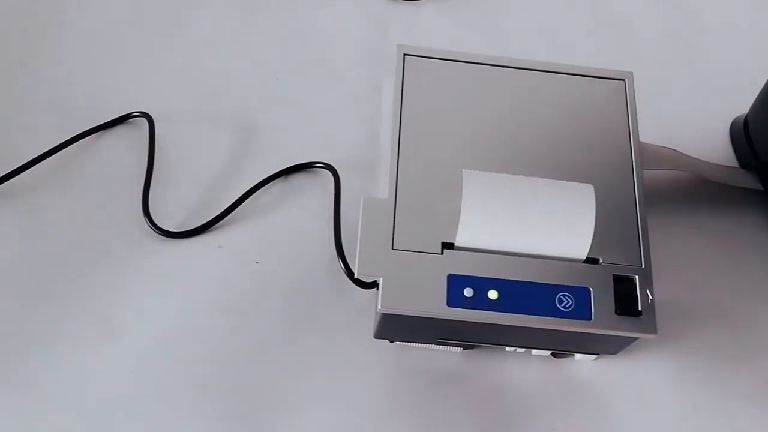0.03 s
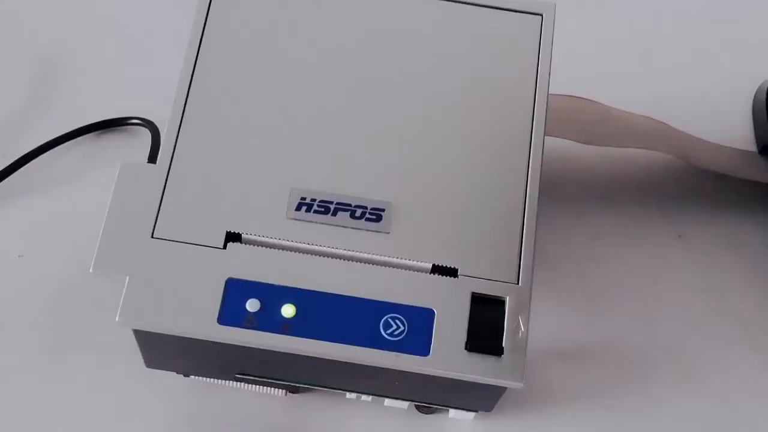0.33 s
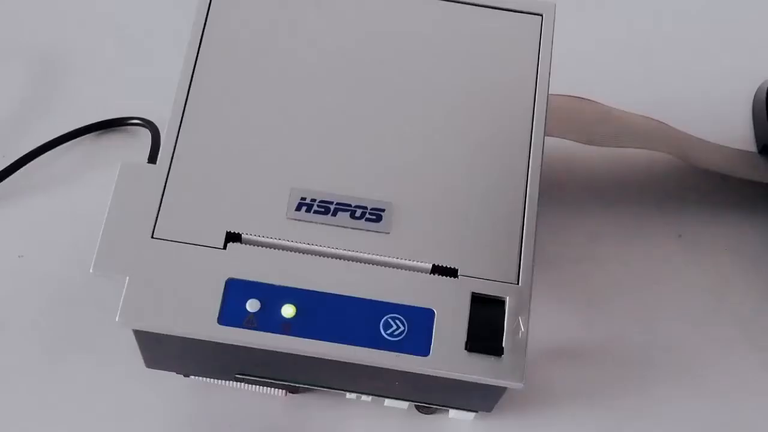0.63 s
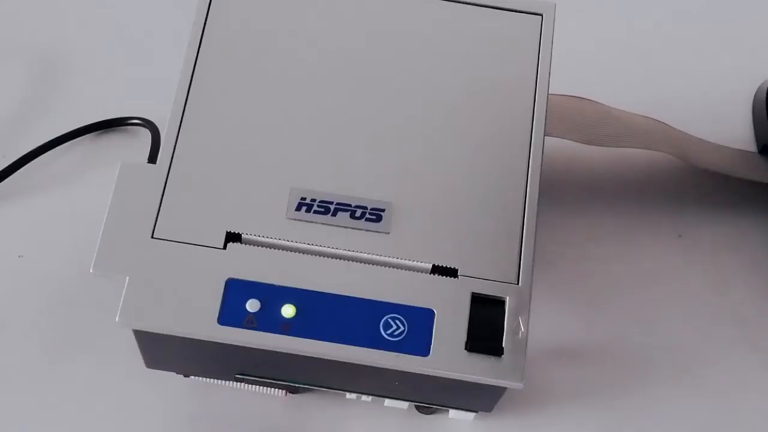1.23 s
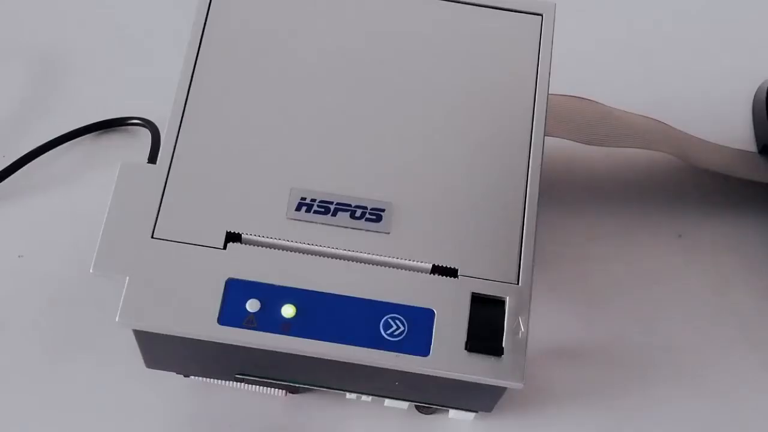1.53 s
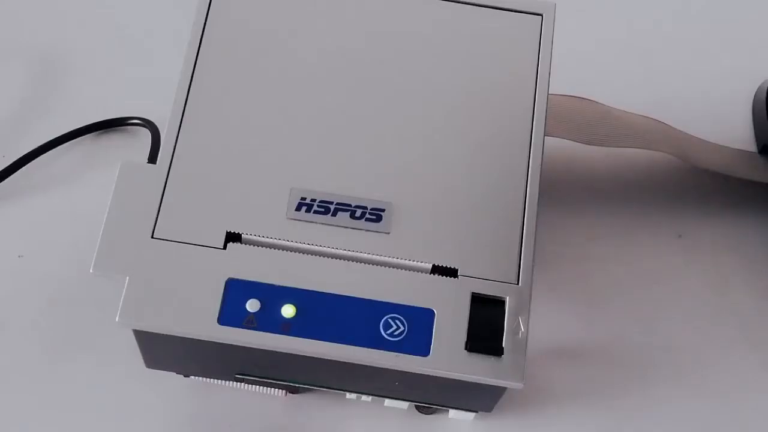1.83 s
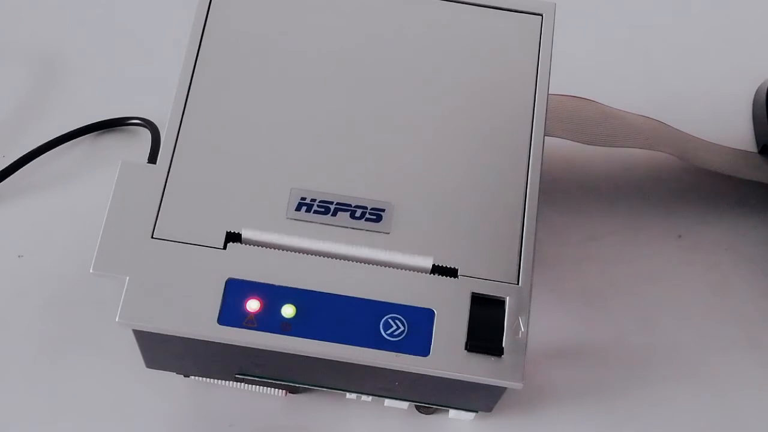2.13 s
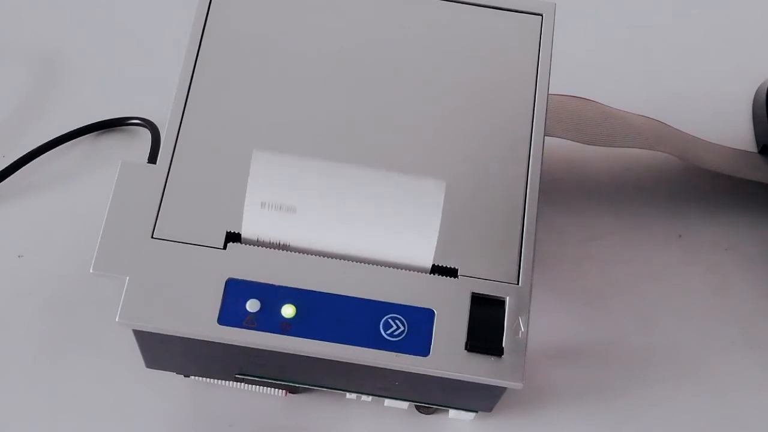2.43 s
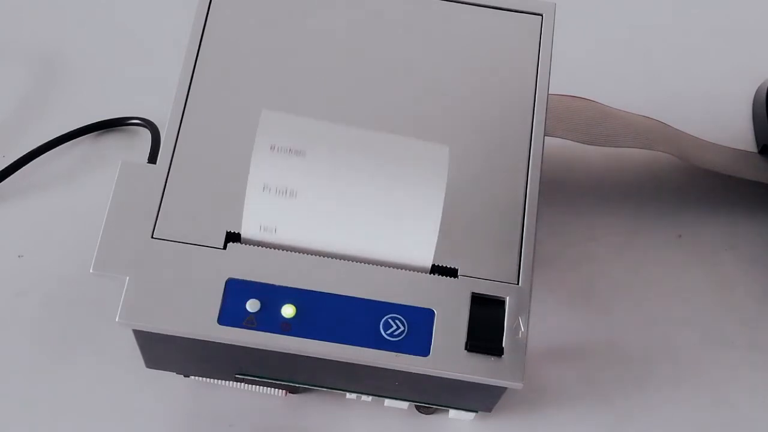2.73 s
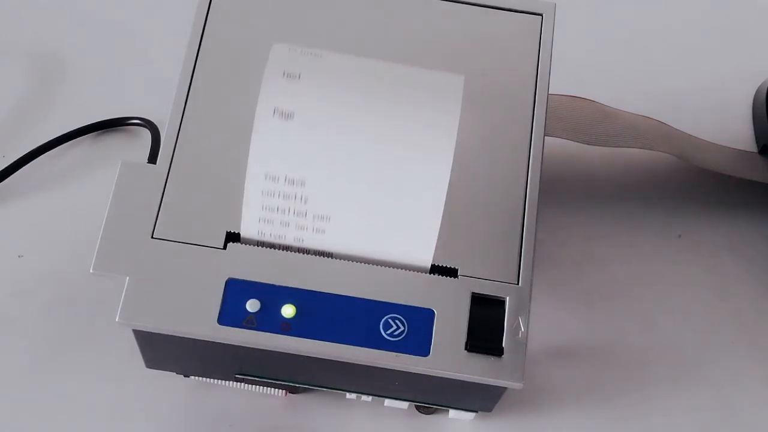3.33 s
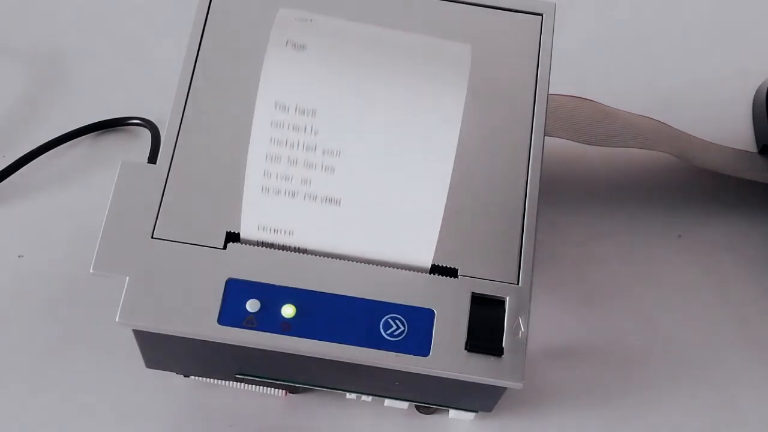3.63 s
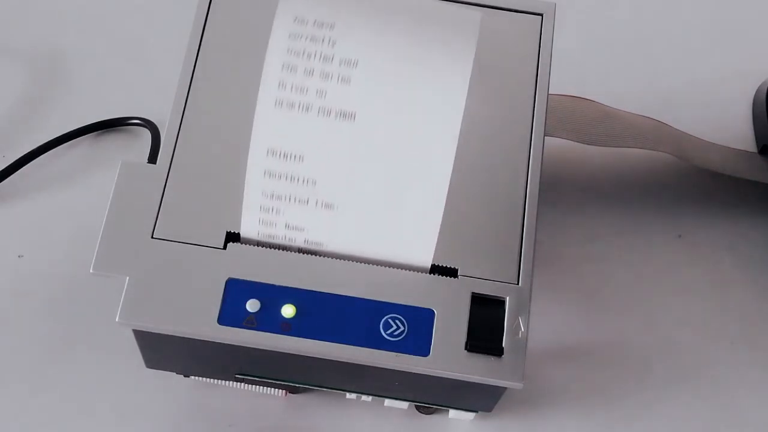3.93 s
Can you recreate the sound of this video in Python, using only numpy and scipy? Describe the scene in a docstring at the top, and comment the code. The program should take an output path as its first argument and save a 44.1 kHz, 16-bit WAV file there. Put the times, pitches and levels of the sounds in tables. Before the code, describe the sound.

A small receipt printer starts with a rattle and whines steadily, feeding out paper.

```python
"""On a table in a quiet room, a small thermal receipt printer is heard from close by.
A hand brushes past, the sound drops out briefly, and faint ticks sound over the room's rumble and hum.
Then the stepper motor, which turns in tiny steps, starts with a rattle and whines steadily,
throbbing once per turn of its gear. The gear teeth buzz and rub. The paper coming out
gives off the whine's lower tones more and more, and adds a rasp and a falling ring."""
import sys
import numpy as np
from scipy import signal
from scipy.fft import rfft, irfft
from scipy.io import wavfile

SR = 44100
rng = np.random.default_rng(int(sys.argv[2]) if len(sys.argv) > 2 else 0)


def unload_audio(sound):
    """Save the sound as a 16-bit wav file, at the path given as the first command line argument."""
    columns = np.transpose(np.atleast_2d(sound))
    # keep every value between -1 and 1, then stretch to whole-number steps
    steps = np.round(np.clip(columns, -1, 1) * 32767)
    wavfile.write(sys.argv[1], SR, steps.astype(np.int16))


N = 176400
T = np.arange(N) / SR
START_S, STEP_HZ, STEPS_PER_TURN = 2.112, 896.18, 15   # the motor
DROPOUT_START_S, DROPOUT_END_S = .2986, .4192


def from_db(db):
    """Turn decibels into a factor to multiply by."""
    return 10 ** (np.asarray(db) / 20)

def curve(rows):
    """Join (time, value) points with straight lines."""
    return np.interp(T, *np.transpose(rows))

def rms_one(x):
    """Scale a signal to an average strength (rms) of 1."""
    return x / np.sqrt(np.mean(x ** 2) + 1e-20)

def colour(x, points):
    """Give a sound a colour: (f/Hz, level/dB) points say how strong its pitches are next to each other."""
    hz, db = np.transpose(points)
    bins = np.maximum(np.arange(N // 2 + 1) * SR / N, 1)
    gain = from_db(np.interp(np.log(bins), np.log(hz), db))
    gain /= np.sqrt(1 + (hz[0] / 2 / bins) ** 4)   # fade away below the first point
    return irfft(rfft(x) * rms_one(gain), N)

def noise(points):
    """Steady noise of the given colour, with a strength near 1."""
    return colour(rng.standard_normal(N), points)

def drift(hz):
    """A random wobble of strength 1, mostly slower than hz."""
    bins = np.arange(N // 2 + 1) * SR / N
    return rms_one(irfft(rfft(rng.standard_normal(N)) / (1 + (bins / hz) ** 2), N))

def resonance(hz, width_hz):
    """Noise that rings around one pitch, which may slide."""
    angle = 2 * np.pi * np.cumsum(hz * np.ones(N)) / SR
    return drift(width_hz) * np.cos(angle) + drift(width_hz) * np.sin(angle)

def bursts(rows, points, decay_s):
    """Short knocks: at each (t/s, level/dB), noise starts at once and dies away."""
    envelope = sum(from_db(db) * (T >= s) * np.exp(-np.abs(T - s) / decay_s) for s, db in rows)
    return colour(envelope * rng.standard_normal(N), points)


# Colours of the rumble, the hiss and the bump: f/Hz, level/dB
RUMBLE_COLOUR = [(20, 1.5), (33, -6.5), (48, -3.5), (70, -8.5), (92, -5.5), (150, -17.5), (280, -14.5),
                 (335, -20.5), (365, -25.5), (520, -25.5), (700, -29.5), (1100, -34), (2000, -40),
                 (3400, -48.5), (4800, -51), (6000, -44.5), (6700, -49.5), (7600, -39.5), (8600, -47),
                 (10000, -54), (16000, -64)]
HISS_COLOUR = [(3000, 1.5), (9000, -4), (12000, -5), (15500, -3.5)]
BUMP_COLOUR = [(15, -5), (35, -10), (70, -27), (200, -50.5), (1000, -80)]
# Tones of the hum before the motor starts: f/Hz, level/dB
HUM_TONES = [(325, -55.5), (4021, -83), (7537, -82), (10900, -92)]

def room():
    """Rumble and hiss, joined after the dropout by a hum and one low bump."""
    hum = np.sqrt(2) * sum(from_db(db) * np.sin(2 * np.pi * (hz * T + rng.random())) for hz, db in HUM_TONES)
    sag_db = -4 * np.clip((T - START_S) / .4, 0, 1)   # the hum sinks once the motor runs
    hum *= (T > DROPOUT_END_S) * from_db(sag_db)
    bump = bursts([(.425, -36)], BUMP_COLOUR, decay_s=.09)
    return from_db(-46.5) * noise(RUMBLE_COLOUR) + from_db(-75) * noise(HISS_COLOUR) + hum + bump


# Ticks: t/s, level/dB, kind (0 full, 1 thin)
TICKS = [(.643, -65, 1), (.7468, -60, 1), (1.0297, -53.5, 0), (1.2466, -62, 1), (1.30, -64, 1),
         (1.7475, -60.5, 1), (1.8805, -47, 0), (1.889, -57, 0), (1.9715, -54.5, 0)]
# Colours of the two kinds: f/Hz, level/dB
FULL_TICK_COLOUR = [(500, -16), (2500, -7), (4200, -7), (5500, -5), (7500, -0.5), (9500, -13), (15000, -27)]
THIN_TICK_COLOUR = [(3000, -25), (6500, -10), (8500, 4), (11000, -3), (15500, -7)]

def ticks():
    """Faint little ticks, some full and some thin and high."""
    full = bursts([(s, db) for s, db, kind in TICKS if kind == 0], FULL_TICK_COLOUR, decay_s=.0032)
    thin = bursts([(s, db) for s, db, kind in TICKS if kind == 1], THIN_TICK_COLOUR, decay_s=.0032)
    return full + thin


# How loud the hand's brush, scrape and rub are: t/s, level/dB
BRUSH_LEVEL = [(0, -64), (.05, -61), (.08, -47), (.097, -50.5), (.11, -45), (.122, -46.5), (.13, -40.5),
               (.134, -41), (.145, -48.5), (.162, -59.5), (.22, -70), (.29, -78)]
SCRAPE_LEVEL = [(0, -65.5), (.05, -61), (.085, -51.5), (.115, -57), (.14, -68.5), (.18, -75)]
RUB_LEVEL = [(.16, -78), (.21, -69), (.235, -65), (.29, -63.5)]
# Colour of the brush: f/Hz, level/dB
BRUSH_COLOUR = [(800, -31), (2300, -12.5), (3800, -7), (5500, -3), (7300, 9.5), (8100, 5), (9500, -7),
                (12000, -14), (16000, -16)]
# Pitches at which the rub rings: f/Hz, width/Hz, level/dB (added to RUB_LEVEL)
RUB_RINGS = [(1327, 68, -5), (2730, 120, -6.5), (3080, 110, -8.5), (3580, 80, -8.5), (4500, 250, -6),
             (5300, 130, -5.5)]

def hand():
    """A hand brushes past with a grainy swish and a falling scrape, then a faint ringing rub."""
    grain_db = -drift(300)
    brush = from_db(curve(BRUSH_LEVEL) + grain_db) * noise(BRUSH_COLOUR)
    scrape_hz = 2776 - 5500 * np.minimum(T, SCRAPE_LEVEL[-1][0])
    scrape = from_db(curve(SCRAPE_LEVEL)) * resonance(scrape_hz, width_hz=870)
    rub = from_db(curve(RUB_LEVEL)) * sum(from_db(db) * resonance(hz, width) for hz, width, db in RUB_RINGS)
    return (brush + scrape + rub) * (T < DROPOUT_START_S)


def gear_turns(run_up):
    """Count the gear's turns: as run_up goes from 0 to 1, it reaches an almost steady full speed."""
    wander, jitter = .00015 * drift(2.05), .0012 * drift(86)
    speed = .7 + .3 * run_up + wander + jitter   # 1 is full speed
    return np.cumsum(speed * (T > START_S)) * STEP_HZ / STEPS_PER_TURN / SR

def contact_force(turns):
    """The parts press harder and softer with each turn and each step."""
    turn_db = -3.5 * np.cos(2 * np.pi * (turns - .5))
    step_db = np.cos(2 * np.pi * STEPS_PER_TURN * turns)
    return from_db(turn_db + step_db)

def rough_surface(turns, size=720):
    """A randomly bumpy surface that comes round again on every turn."""
    surface = irfft(np.exp(2j * np.pi * rng.random(size // 2)), size * 16)
    positions = np.arange(len(surface)) / len(surface)
    return rms_one(np.interp(turns % 1, positions, surface))

def gear_tones(turns, counts, levels_db):
    """Pure tones that each swing a set number of times per gear turn."""
    return np.sqrt(2) * sum(from_db(db) * np.sin(2 * np.pi * (count * turns + rng.random()))
                            for count, db in zip(counts, levels_db))


# Gear clicks: t/s, level/dB
CLICKS = [(2.0960, -43), (2.0977, -30.5), (2.1000, -34), (2.1028, -37), (2.1055, -31.5), (2.1085, -34),
          (2.1113, -28.5), (2.1198, -34), (2.1243, -39), (2.1295, -42), (2.4755, -35), (2.4805, -39)]
# Colours of the clicks and of the case's thud: f/Hz, level/dB
CLICK_COLOUR = [(200, -24), (600, -16), (1300, -16), (2600, -17), (3800, -8.5), (5000, -15), (6600, -11),
                (7800, 7), (8800, -10), (10000, -14), (12000, -38), (16000, -27)]
THUD_COLOUR = [(100, -22), (300, -1), (550, 1), (1000, -10), (2000, -5), (4000, -17)]

def rattle():
    """The gears rattle and the case is jolted at the start; two more clicks follow while running."""
    clicks = bursts(CLICKS, CLICK_COLOUR, decay_s=.0019)
    thud = bursts([(2.113, -42.5)], THUD_COLOUR, decay_s=.025)
    return clicks + thud


# How the paper's rasp grows: t/s, level/dB (before a small boost)
RASP_LEVEL = [(2.15, -63), (2.348, -81), (2.822, -61), (2.838, -56), (3.23, -52.5), (3.98, -49.5)]
# Colour of the rasp: f/Hz, level/dB
RASP_COLOUR = [(900, -42), (1450, -28), (1700, -0.5), (2000, -4), (2300, 1.5), (2650, 7.5), (2950, -3),
               (3200, -9), (3800, -11), (4500, -46)]
# Tones from a ripple on every third motor step: swings per turn; level/dB at their loudest
RIPPLE_PER_TURN = [10, 20, 35, 40]
RIPPLE_DB = [-60, -69, -58, -59]

def paper_rasp(turns):
    """The steps shake the growing paper strip, so it rasps and lets the motor's ripple be heard."""
    level_db = curve(RASP_LEVEL)
    boost_db, repeat_share = 1.5, .38   # this share of the rasp is the same on every turn
    rub = np.sqrt(repeat_share) * rough_surface(turns) + np.sqrt(1 - repeat_share) * rng.standard_normal(N)
    rasp = from_db(level_db + boost_db) * colour(rub * contact_force(turns), RASP_COLOUR)
    ripple = gear_tones(turns, RIPPLE_PER_TURN, RIPPLE_DB) * from_db(level_db - level_db.max())
    return rasp + ripple

def paper_ring(turns):
    """The strip rings ever lower as it gets longer, swelling to its full level."""
    hz = 3900 - 1000 * np.maximum(T - START_S, 0)
    level_db = -53.5 + 19 * np.minimum(T - 2.92, 0)
    return from_db(level_db) * resonance(hz, width_hz=320) * contact_force(turns)


# Colours of the teeth's buzz and of their rubbing: f/Hz, level/dB
BUZZ_COLOUR = [(300, -32), (1000, -33), (1300, -41), (2600, -46), (3300, -4), (4100, -13), (5000, -33),
               (6000, -3.5), (6900, 1), (7750, 11.5), (8600, 8), (9200, -6), (9700, -3), (10400, -17),
               (12000, -22), (14100, -30), (14600, -28), (15050, -28), (15500, -17)]
FRICTION_COLOUR = [(300, -18), (520, -4), (900, -14.5), (1400, -15.5), (2700, -6), (4200, -14), (5100, -10),
                   (6600, -3.5), (7400, 3), (8100, 1), (8800, -3), (9700, -10.5), (11000, -19),
                   (13500, -24), (15600, -15.5)]
# Thin tones of the teeth: swings per turn; level/dB
TOOTH_TONES_PER_TURN = [130, 134, 160, 162, 181, 210, 220, 242, 243, 258, 259]
TOOTH_TONES_DB = [-56, -66.5, -62.5, -67, -71, -81, -82, -78, -80, -74, -82]

def gears(turns):
    """Teeth pressing together buzz and sing alike on every turn, and rub with ever new noise."""
    force = contact_force(turns)
    buzz = from_db(-56.5) * colour(rough_surface(turns) * force, BUZZ_COLOUR)
    tones = gear_tones(turns, TOOTH_TONES_PER_TURN, TOOTH_TONES_DB)
    friction = from_db(-48) * colour(rng.standard_normal(N) * force, FRICTION_COLOUR)
    return buzz + tones + friction


# The whine's harmonics (tones at whole multiples of the step rate). Side tones, spaced by the gear's
# turn rate, make each one throb. Columns: harmonic number, shift of the throb/turns,
# then level/dB of side tones -2 and -1, the harmonic itself, and side tones +1, +2 and +3
WHINE_TONES = [(1, 0.42, -86, -63.5, -48.5, -67.5, -72, -100), (2, 0.65, -92, -91, -49, -60, -64, -86),
               (3, .52, -62, -46.7, -39.3, -45.6, -51, -61), (4, 0.43, -68, -98.5, -56.5, -57.5, -67, -71),
               (5, 0.4, -79, -67, -71.5, -63, -70.5, -72), (6, 0.66, -93, -82, -68, -59.5, -67.5, -82),
               (7, 0.62, -82, -62, -61.5, -53.5, -59, -82), (8, .3, -57, -46, -54, -43, -56, -67),
               (9, 0.54, -57, -78, -53.5, -50.5, -52, -57), (10, 0.61, -68, -58.5, -72, -60, -61.5, -69),
               (11, 0.16, -60, -67, -68, -78, -70, -69)]
# How strongly the paper gives off the lower harmonics: harmonic number -> t/s, level/dB (relative)
PAPER_SWELL = {2: [(2.14, -57), (2.386, -67.5), (2.626, -54), (2.688, -66), (2.872, -64), (2.898, -55),
               (3.394, -50.5), (3.656, -42.5), (3.896, -46.5), (3.98, -42)], 3: [(2.14, -52),
               (2.272, -45.5), (2.324, -54.5), (2.416, -45), (2.58, -47), (2.878, -38), (3.112, -36),
               (3.4, -38.5), (3.564, -36.5), (3.83, -40.5), (3.98, -38)], 4: [(2.14, -65), (2.334, -62),
               (2.36, -56), (2.452, -63), (2.718, -49), (3.206, -51.5), (3.8, -57), (3.98, -54.5)]}

def motor_whine(turns):
    """The motor's quick steps make a stack of tones, each throbbing once per gear turn."""
    skew_rad = .49   # turns part of the throb into a wobble in pitch
    full_s = 2.9   # from here on, the swelling tones average their full level
    whine = 0
    for harmonic, shift, *levels in WHINE_TONES:
        throb = sum(from_db(db) * np.exp(1j * (2 * np.pi * side * (turns - shift) + skew_rad * side ** 2))
                    for side, db in enumerate(levels, -2))
        tone = np.real(throb * np.exp(2j * np.pi * (harmonic * STEPS_PER_TURN * turns + rng.random())))
        swell_db = curve(PAPER_SWELL[harmonic]) if harmonic in PAPER_SWELL else np.zeros(N)
        swell_db -= swell_db[T > full_s].mean()
        waver_db = 1.03 * drift(18)
        whine += np.sqrt(2) * tone * from_db(swell_db + waver_db)
    return whine

def printer():
    """The printer starts with a rattle, and its motor, gears and paper quickly come up to speed."""
    run_up = np.clip((T - START_S) / .022, 0, 1)
    turns = gear_turns(run_up)
    running = motor_whine(turns) + gears(turns) + paper_rasp(turns) + paper_ring(turns)
    return rattle() + run_up ** 2 * running

def scene():
    """Add all the sounds together in one channel."""
    return (room() + ticks() + hand() + printer())[None]

def record(dry):
    """The sound drops out briefly, and the very highest pitches are cut off."""
    fade_s, cutoff_hz = .015, 15700
    audible = np.clip(np.maximum(DROPOUT_START_S - T, T - DROPOUT_END_S) / fade_s, 0, 1)
    low_pass = signal.ellip(10, .1, 60, cutoff_hz, fs=SR, output="sos")
    return signal.sosfiltfilt(low_pass, dry * audible)


dry = scene()
out = record(dry)
unload_audio(out)
```